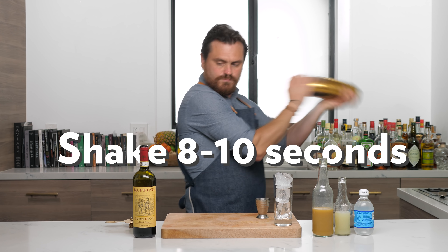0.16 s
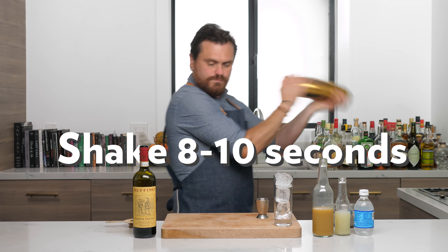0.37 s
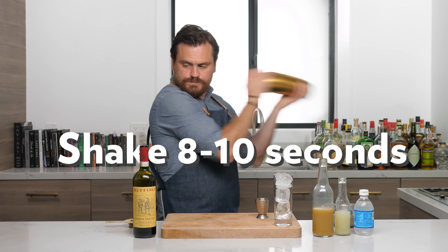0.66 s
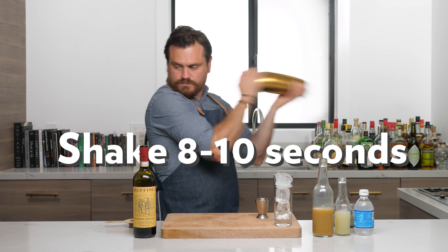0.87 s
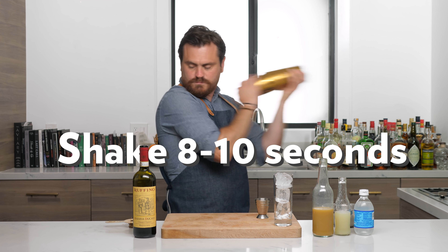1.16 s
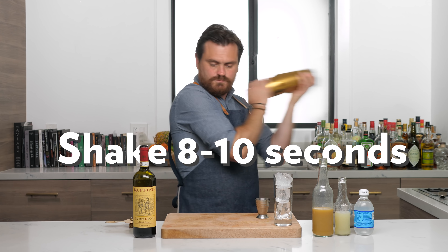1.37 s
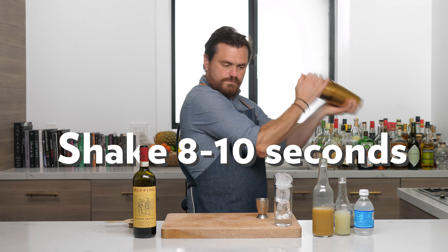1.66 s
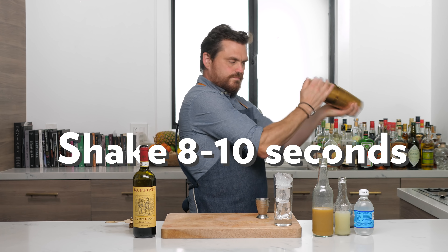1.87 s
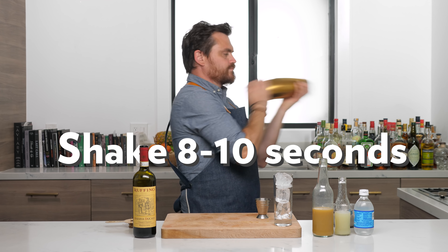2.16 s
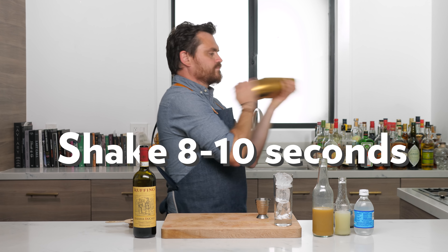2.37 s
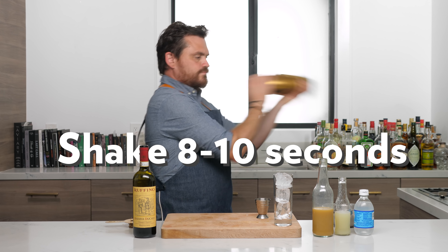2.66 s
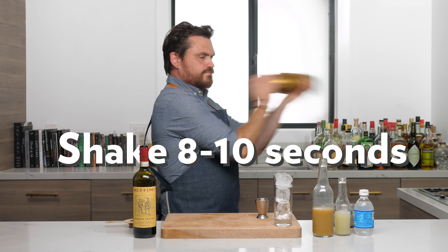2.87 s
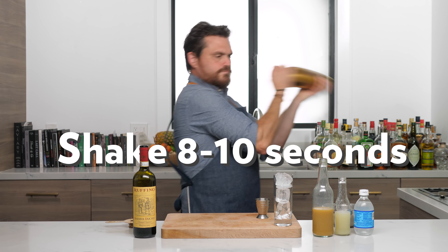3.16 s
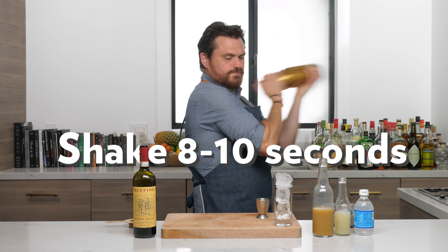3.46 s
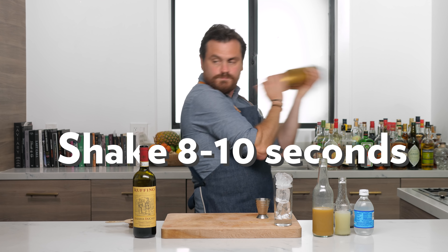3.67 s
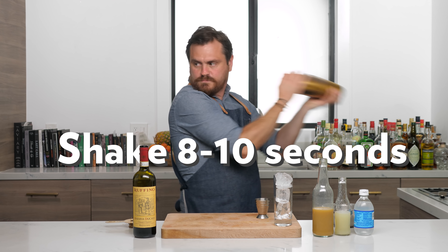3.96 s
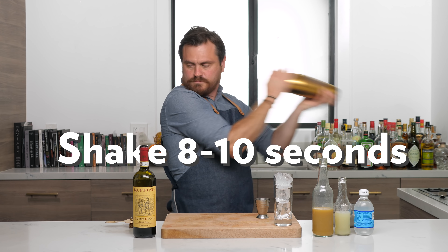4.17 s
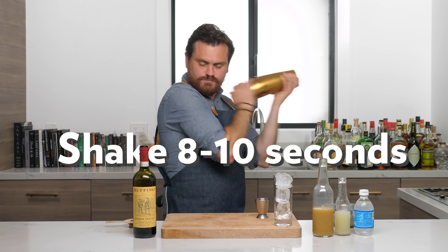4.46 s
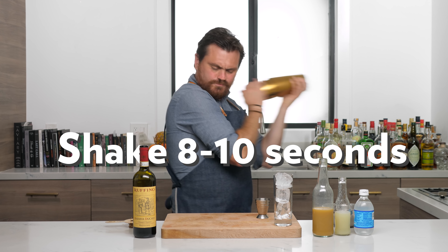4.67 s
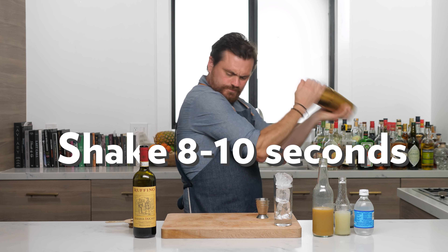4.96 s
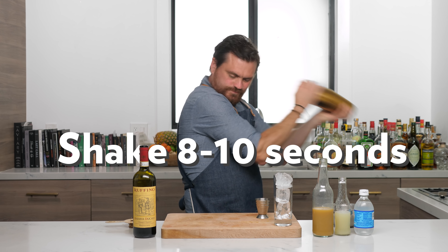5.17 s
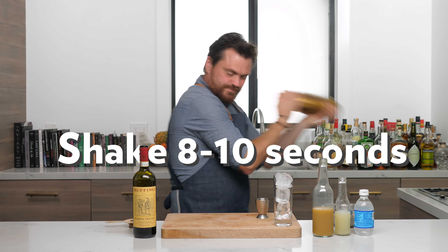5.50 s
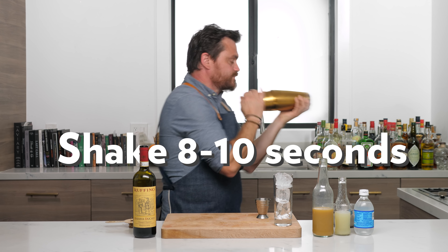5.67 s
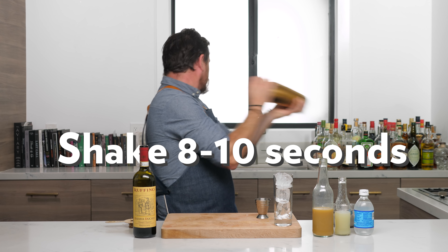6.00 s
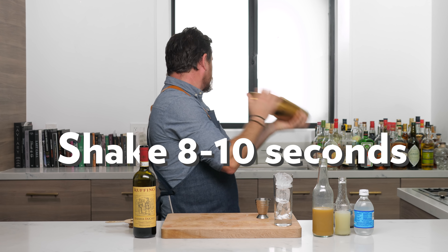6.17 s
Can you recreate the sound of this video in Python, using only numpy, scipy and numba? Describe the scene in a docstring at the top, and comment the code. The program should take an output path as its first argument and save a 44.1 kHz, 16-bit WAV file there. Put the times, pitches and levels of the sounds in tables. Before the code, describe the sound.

Vigorous, steady cocktail shaking: dense crunchy ice clatter, hollow knocks and wet foamy slosh in hand-damped tin, plus low shirt bumps at the microphone.

```python
"""A small kitchen, a clip-on microphone on the shirt: a metal shaker of ice and liquid is shaken hard close by.
It goes back and forth about five times a second. Cubes, chips and spray are bursts of short damped sines and
unpitched cracks, with filtered-noise foam between them, all heard through the resonances of the hand-damped tin.
Pitched knocks and jolts mark the ends of the travel; cloth rumbles, bumps and scratches at the microphone.
The room adds a faint diffuse wash, a fast limiter holds the peaks and the extreme treble is cut."""
import sys
import numpy as np
from scipy import signal
from scipy.fft import rfft, irfft
from scipy.io import wavfile
from scipy.ndimage import uniform_filter1d, minimum_filter1d
from numba import njit

SR = 44100
rng = np.random.default_rng(int(sys.argv[2]) if len(sys.argv) > 2 else 0)


def unload_wav(signal):
    """Save mono or channel-first audio to the path in sys.argv[1] as 16-bit WAV at rate SR, clipped to [-1, 1]."""
    wavfile.write(
        sys.argv[1],
        SR,
        np.round(np.clip(np.atleast_2d(signal).T, -1, 1) * 32767).astype(np.int16),
    )


N = 279505
TIME = np.arange(N) / SR  # seconds

# The load piling into an end of the tin, twice in each back-and-forth; levels before each part's own gain:
# [t/s, tumbling cubes level/dB, chips and spray level/dB]
STROKES = [(0.056, -18, -24.5), (0.164, -19.5, -20.5), (0.261, -20.5, -21), (0.374, -18.5, -18.5),
           (0.468, -19, -20), (0.589, -18, -20), (0.682, -18, -16.5), (0.791, -18.5, -21.5),
           (0.892, -18.5, -20.5), (0.996, -17.5, -19.5), (1.087, -19, -20), (1.207, -18.5, -19.5),
           (1.303, -25.5, -23), (1.442, -19, -17), (1.536, -19.5, -25.5), (1.629, -19, -20),
           (1.734, -21, -19), (1.808, -17.5, -20), (1.918, -19.5, -19), (2.059, -16, -18),
           (2.162, -23.5, -25.5), (2.288, -17.5, -19.5), (2.364, -26, -28), (2.471, -16, -20),
           (2.568, -22, -23.5), (2.674, -21, -22.5), (2.77, -16.5, -18.5), (2.895, -19.5, -21.5),
           (2.981, -20, -21), (3.099, -17.5, -20.5), (3.197, -18, -24), (3.317, -17, -20.5),
           (3.388, -20.5, -19.5), (3.504, -19.5, -20.5), (3.59, -20.5, -23), (3.702, -19, -20),
           (3.797, -23.5, -24.5), (3.924, -21, -22.5), (3.981, -21.5, -20.5), (4.12, -21, -21.5),
           (4.196, -21, -21.5), (4.325, -15, -18), (4.377, -19.5, -18.5), (4.497, -18, -19.5),
           (4.597, -21.5, -21), (4.712, -17.5, -20.5), (4.782, -18.5, -19), (4.918, -18.5, -23),
           (4.988, -21, -21.5), (5.122, -20, -21), (5.187, -17.5, -18.5), (5.295, -17.5, -21.5),
           (5.409, -21, -18.5), (5.506, -19.5, -22), (5.616, -23, -21.5), (5.704, -17, -23.5),
           (5.833, -24, -26), (5.97, -20.5, -18.5), (6.053, -23, -21.5), (6.112, -19, -23),
           (6.188, -23.5, -24), (6.296, -24, -26)]


def load():
    """Close by, in the tin: tumbling cubes, fine chips and spray, foam, and bubbles folded into the drink."""
    _, cubes_db, spray_db = np.transpose(STROKES)

    # one collision gives a ring, a tick and a dull thud
    when, size = contacts(rate=800, spread_db=4.5)
    rings = chatter(when, size, lo_hz=975, hi_hz=4205, t60=0.0081, bounce_s=.004, count=4)
    rings = unit(band(rings, 590, 5800))
    ticks = unit(band(cracks(when, size, t60=.0035), 3400, 15300))
    thuds = chatter(when, size, lo_hz=378, hi_hz=1497, t60=0.0052, bounce_s=0.00096, count=2)
    thuds = unit(band(thuds, 180, 1970))

    when, size = contacts(rate=350, spread_db=5.0)
    spray = chatter(when, size, lo_hz=4180, hi_hz=14800, t60=0.0012, bounce_s=0.0018, count=4)
    spray = unit(band(spray, 2400, 15000))

    when, size = contacts(rate=170, spread_db=5)
    bubbles = unit(chatter(when, size, lo_hz=401, hi_hz=976, t60=0.024, bounce_s=0.00398, count=2))

    # foam rushing along the wall fills the gaps between the contacts
    foam = unit(rng.standard_normal(N))
    low_foam = undb(-6.5) * unit(band(foam, 710, 4730))
    high_foam = undb(-1.5) * unit(band(foam, 3570, 19000))

    bend = np.exp(.021 * walk(rate=10))  # about 2 % wander of the tin's resonances
    cube_surge = surge(cubes_db, lag_s=0, attack_s=0.12, release_s=.03, gain_db=-1.2)
    spray_surge = surge(spray_db, lag_s=-.006, attack_s=.08, release_s=0.0245, gain_db=-0.3)
    slosh_surge = surge(cubes_db, lag_s=-0.25, attack_s=0.073, release_s=0.0424, gain_db=-8.5)

    rattle = share(tin(rings + low_foam, bend)) * cube_surge
    rattle = rattle + share(tin(ticks + spray + high_foam, bend)) * spray_surge
    rattle = rattle + share(tin(thuds + bubbles, bend)) * slosh_surge
    return rattle * free_flight(depth_db=-2, flight_s=.014)


def surge(levels_db, lag_s, attack_s, release_s, gain_db):
    """At each stroke the load slowly gathers speed, piles into the end of the tin and stops short."""
    power = 0
    for s, db in zip(np.transpose(STROKES)[0], levels_db):
        age = TIME - s - lag_s
        fall = np.where(age < 0, (age / attack_s) ** 2, age / release_s)
        power = power + (undb(db + gain_db) * np.exp(-fall)) ** 2
    return np.sqrt(power)


def share(x, window_s=.035):
    """Even out the energy, so a stroke shares it among few big contacts or many small ones."""
    window = int(window_s * SR)
    power = uniform_filter1d(unit(x) ** 2, window)
    return unit(x) / np.sqrt(uniform_filter1d(power, window) + 1e-3)


# Broad colour of the closed tin: [f/Hz, level/dB]
TIN_COLOUR = [(260, -20.5), (380, -7), (520, -5.5), (780, -9.5), (1150, -6), (1700, -0.6), (2100, 0.5),
              (2650, -0.5), (3300, -4), (4200, -7), (4750, -1.5), (5600, -6), (12100, -11), (12700, -25.5)]
# Narrow resonances of its wall and air, centres before bending: [f/Hz, width/Hz, level/dB]
TIN_RINGS = [(510, 29, -13), (1329, 57, -2), (2106, 33, -2), (2532, 57, 1), (2726, 52, 0.5), (3610, 64, -3),
             (9920, 250, -1.5)]


def tin(x, bend):
    """What is inside is heard through the wall; hands keep its rings short, the moving drink bends their pitch."""
    coloured = colour(x, TIN_COLOUR)
    rings = sum(undb(db) * resonate(coloured, hz * bend, float(width)) for hz, width, db in TIN_RINGS)
    return coloured + rings


# Single cubes flying free and striking the wall, all about equally hard: [t/s]
CLACKS = [0.037, 0.164, 0.209, 0.257, 0.618, 0.664, 0.732, 0.819, 1.116, 1.23, 1.308, 1.423, 1.47, 1.553,
          1.586, 1.658, 1.667, 1.73, 1.825, 1.891, 2.042, 2.063, 2.131, 2.274, 2.343, 2.447, 2.515, 2.557,
          2.621, 2.628, 2.684, 2.72, 2.83, 2.959, 3.13, 3.232, 3.377, 3.42, 3.714, 3.752, 3.77, 3.798,
          3.955, 3.985, 4.069, 4.148, 4.225, 4.278, 4.299, 4.354, 4.428, 4.525, 4.627, 4.808, 4.911, 4.935,
          4.999, 5.112, 5.138, 5.173, 5.187, 5.231, 5.315, 5.416, 5.475, 5.499, 5.512, 5.533, 5.567, 5.657,
          5.841, 5.942, 6.039, 6.137, 6.201, 6.263]


def clacks():
    """A hard tick of ice on steel sets off the tin's main ring, at a pitch that depends on where the cube lands."""
    s = np.ravel(CLACKS)
    place, force = rng.random((len(s), 2)).T
    hz = 1900 + 900 * place
    db = 0.6 * (4 * force - 2)  # within 1.2 dB either way
    ring = grains(s, hz, .007, undb(db + 4), .0016)
    clink = grains(s, hz * 1.08, 0.03, undb(db - 15.5), .002)  # the steel rings on faintly
    tick = cracks(s, undb(db - 13.5), t60=.004)
    return band(ring + clink, 1200, 4200) + band(tick, 700, 10000)


# The whole load landing in an end of the tin, before each part's gain and pitch ratio: [t/s, level/dB, f/Hz]
KNOCKS = [(0.046, -10, 425), (0.138, -16, 620), (0.241, -12, 536), (0.345, -14.5, 431), (0.462, -10.5, 440),
          (0.547, -12.5, 544), (0.659, -9.5, 514), (0.689, -15.5, 410), (0.759, -14, 480),
          (0.875, -9.5, 350), (1.087, -13.5, 360), (1.3, -15.5, 412), (1.404, -11.5, 536),
          (1.502, -12, 528), (1.521, -10.5, 522), (1.723, -22, 651), (2.007, -13, 550), (2.237, -7, 562),
          (2.443, -16, 534), (2.554, -16, 544), (2.665, -20, 460), (2.746, -11, 463), (2.973, -14.5, 670),
          (3.053, -6.5, 560), (3.151, -11.5, 520), (3.377, -16, 525), (3.571, -12, 510), (3.795, -20, 358),
          (3.979, -14, 500), (4.175, -13.5, 433), (4.224, -19, 388), (4.303, -14, 522), (4.404, -15, 500),
          (4.497, -12, 500), (4.617, -11.5, 386), (4.699, -17, 640), (5.23, -14, 506), (5.301, -7.5, 546),
          (5.696, -14, 660), (5.83, -13, 334), (6.101, -13.5, 660)]
# What a knock rings with, before a slight random detune: [multiple of its pitch, t60/s, level/dB]
KNOCK_MODES = [(1.001, 0.027, 2.7), (1.4, 0.019, -3), (2.3, 0.017, -4.5)]


def knocks():
    """Ice thumps the end of the tin and the drink slaps in after it; the air trapped there sets the pitch."""
    s, db, hz = np.transpose(KNOCKS)
    slap_s = s + .014 * (.5 + rng.random(len(s)))  # the drink follows by 7 to 21 ms
    slap_t60 = 0.033
    clunk = grains(slap_s, hz * .82, slap_t60, undb(db - 4), slap_t60 / 10)
    for ratio, t60, mode_db in KNOCK_MODES:
        detune = 1 + .02 * rng.standard_normal(len(s))
        clunk = clunk + grains(s, hz * ratio * detune, t60, undb(db + mode_db), .0015)
    # loose cubes land around the knock, the first up to 16 ms ahead of it
    tumble = chatter(s - .016, undb(db - 8.5), lo_hz=380, hi_hz=900, t60=0.02, bounce_s=.05, count=5)
    return band(clunk + tumble, 280, 5000)


def free_flight(depth_db, flight_s):
    """The rattle thins while a cube or the whole load is in the air, just before it lands."""
    landings = np.sort(np.append(CLACKS, np.transpose(KNOCKS)[0]))
    ahead = landings[np.searchsorted(landings, TIME) % len(landings)] - TIME
    return undb(depth_db * np.exp(-(ahead / flight_s) ** 2) * (ahead > 0))


# The tin jolting against the hands, level before the band-pass: [t/s, level/dB]
JOLTS = [(0.045, -11.5), (0.24, -15.5), (0.875, -14.5), (1.087, -12), (1.502, -17), (1.521, -13),
         (1.723, -16), (2.554, -12), (3.151, -14), (4.175, -14.5), (4.224, -13), (4.404, -15), (5.83, -20)]


def jolts():
    """The tin is stopped short by the hands with a dull thump, a quick damped sine around 225 Hz."""
    s, db = np.transpose(JOLTS)
    hz = 225 * np.exp(.12 * rng.standard_normal(len(s)))
    return band(grains(s + .001, hz, 0.021, undb(db), .0008), 120, 5000)


# The shirt bumping the microphone, before each part's gain and pitch ratio: [t/s, level/dB, f/Hz]
BUMPS = [(0.298, -18.5, 43.1), (0.579, -20.5, 156), (0.625, -15, 70.0), (0.719, -24, 80),
         (1.414, -24, 70.0), (1.566, -20, 136), (1.764, -15.5, 40.4), (1.877, -15.5, 79), (1.99, -15, 97.5),
         (2.101, -10.5, 66), (2.502, -11.5, 59.2), (2.529, -10.5, 37.7), (3.339, -8, 103), (3.631, -18, 54),
         (4.271, -23, 70), (4.367, -10.5, 48.4), (4.568, -9, 53.8), (4.765, -20.5, 80), (4.956, -15, 82),
         (4.98, -9, 67), (5.446, -24, 49.3), (5.655, -17, 58)]
# Colour of cloth rumble at the microphone: [f/Hz, level/dB]
CLOTH = [(15, -15), (30, 4), (80, -0.5), (130, -7.5), (220, -14.5), (500, -37), (2000, -77)]
# How hard the shirt drags over the microphone, before a random wander: [t/s, level/dB]
SHIRT_DRAG = [(0, 1), (1.2, -6), (2, -2), (3, -5), (4.1, -10), (4.4, 2), (5.2, -6), (5.7, -9), (6.3, -13)]


def shirt():
    """Right at the microphone, cloth drags in uneven rumbles and bumps it with low damped sines."""
    s, db, hz = np.transpose(BUMPS)
    bumps = band(grains(s + 0.0026, hz, 0.065, undb(db + 6.5), 0.0056), 20, 270)
    fold_hz = hz * (1.6 + 1.53 * rng.random(len(s)))
    folds = band(grains(s + 0.00834, fold_hz, 0.051, undb(db - 4.5), 0.0033), 97, 560)

    when, size = contacts(rate=37, spread_db=7.5)
    drag = chatter(when, size, lo_hz=25.0, hi_hz=127, t60=0.078, bounce_s=0.019)
    drag = unit(colour(drag, CLOTH))
    rumble = unit(colour(rng.standard_normal(N), CLOTH))
    vigour_db = np.interp(TIME, *np.transpose(SHIRT_DRAG)) + 2.9 * walk(rate=13) - .7
    rubbing = undb(vigour_db) * (undb(-31.5) * drag + undb(-34.5) * rumble)
    return bumps + folds + band(rubbing, 15, 2000)


# The sleeve brushing the microphone on forward pushes, before a common gain: [t/s, level/dB]
SWISHES = [(.04, -30.5), (.245, -28), (.44, -27), (.65, -33), (.87, -36), (1.27, -27.5), (1.48, -28.5),
           (1.91, -26.5), (2.75, -36), (3.17, -31), (3.37, -33), (3.58, -29.5), (3.715, -30), (3.98, -28),
           (4.38, -32), (4.58, -32), (4.79, -35), (5.18, -28)]


def swishes():
    """At the microphone, fibres catch and slip in a short, very bright scratch."""
    when, size = contacts(rate=280, spread_db=3)
    fibres = cracks(when, size, t60=0.0037)
    half_length_s, gain_db = 0.028, 3.5
    push = sum(undb(db + gain_db) * np.exp(-((TIME - s) / half_length_s) ** 2) for s, db in SWISHES)
    return share(band(fibres, 7200, 14000)) * push


def kitchen(x, t60, wet_db):
    """The moving shaker is answered by the room with a diffuse noise wash that follows each band's energy."""
    keep = np.exp(-np.log(1e6) / (t60 * SR))  # energy falls 60 dB in t60 seconds
    wash = 0
    for lo_hz in 375 * 2 ** np.arange(0, 5, .5):  # half-octave bands
        hi_hz = lo_hz * np.sqrt(2)
        energy = signal.lfilter([1 - keep], [1, -keep], band(x, lo_hz, hi_hz) ** 2)
        wash = wash + np.sqrt(energy) * unit(band(rng.standard_normal(N), lo_hz, hi_hz))
    return x + undb(wet_db) * wash


def contacts(rate, spread_db):
    """Times and sizes of random collisions, rate per second: many small, few large."""
    moment, luck = rng.random((int(rate * TIME[-1]), 2)).T
    return moment * TIME[-1], undb(-spread_db * np.log(1 - .98 * luck))


def chatter(when, size, lo_hz, hi_hz, t60, bounce_s, count=3):
    """Each piece has its own pitch and touches several times in quick succession, never quite the same way."""
    pitch = np.repeat(lo_hz + (hi_hz - lo_hz) * rng.random(len(when)), count)
    pitch = pitch * np.exp(0.185 * rng.standard_normal(len(pitch)))
    lag = bounce_s * rng.random((len(pitch), 2)).mean(axis=1)
    touches = np.repeat(when, count) + lag
    return grains(touches, np.minimum(pitch, SR / 2), t60, np.repeat(size, count), t60 / 4)


@njit
def grains(times, hz, t60, size, rise_s):
    """One damped sine for each contact or bubble; it builds up while the contact lasts."""
    out = np.zeros(N)
    for k in range(len(times)):
        start = max(int(times[k] * SR), 0)
        z = size[k] + 0j
        pole = np.exp((2j * np.pi * hz[k] - np.log(1000) / t60) / SR)
        for i in range(start, min(N, start + int(t60 * SR))):
            out[i] += z.imag * min((i - start + 1) / (rise_s * SR), 1)
            z *= pole
    return out


def cracks(when, size, t60):
    """A hard or catching contact with no pitch: a brief noise burst whose energy swells and dies away."""
    keep = np.exp(-np.log(1e6) / (t60 * SR))
    energy = np.bincount((when * SR).astype(int), size ** 2, N)[:N] + 1e-18
    energy = signal.lfilter([np.e * (1 - keep)], np.poly([keep, keep]), energy)
    return np.sqrt(np.abs(energy)) * rng.standard_normal(N)


@njit
def resonate(x, hz, width):
    """A resonance as a two-state band-pass whose centre moves every sample."""
    out, band_state, low_state = np.empty(len(x)), 0., 0.
    for i in range(len(x)):
        g = np.tan(np.pi * hz[i] / SR)
        damping = width / hz[i]
        v = (band_state + g * (x[i] - low_state)) / (1 + g * (g + damping))
        band_state = 2 * v - band_state
        low_state = low_state + 2 * g * v
        out[i] = damping * v
    return out


def colour(x, points, size=4096):
    """Causal (minimum-phase) filter through (Hz, dB) points, by folding the cepstrum."""
    hz, db = np.transpose(points)
    bins_hz = np.arange(size // 2 + 1) * SR / size
    log_gain = np.log(undb(np.interp(np.log(bins_hz + 1), np.log(hz), db)))
    cepstrum = irfft(log_gain)
    cepstrum[1:size // 2] *= 2
    cepstrum[size // 2 + 1:] = 0
    impulse = irfft(np.exp(rfft(cepstrum, size)))
    return signal.fftconvolve(x, impulse)[:len(x)]


def band(x, lo_hz, hi_hz, order=2):
    """Causal band-pass."""
    sos = signal.butter(order, [lo_hz, min(hi_hz, .49 * SR)], "band", fs=SR, output="sos")
    return signal.sosfilt(sos, x + 1e-18)


def walk(rate):
    """Smooth random wander of rms 1, with rate knots per second."""
    knots = np.arange(0, TIME[-1] + 1, 1 / rate)
    return unit(np.interp(TIME, knots, rng.standard_normal(len(knots))))


def undb(db):
    """Decibels to gain."""
    return 10 ** (np.asarray(db) / 20)


def unit(x):
    """Scale to rms 1."""
    return x / np.sqrt(np.mean(x ** 2))


def scene():
    """The shaker close by in its room, and the shirt right at the microphone."""
    shaker = load() + clacks() + knocks() + jolts()
    in_room = kitchen(shaker, t60=.2, wet_db=-17)
    return (in_room + shirt() + swishes())[None]


def record(dry, ceiling_db=-3, hold_s=0.0017):
    """At the microphone's output a fast limiter holds the peaks, and the top is cut above 15850 Hz."""
    hold = int(hold_s * SR)
    gain = 1 / np.maximum(np.abs(dry) / undb(ceiling_db), 1)
    gain = uniform_filter1d(minimum_filter1d(gain, hold), hold)
    top_cut = signal.ellip(10, .2, 80, 15850, fs=SR, output="sos")
    return signal.sosfilt(top_cut, dry * gain)


dry = scene()
out = record(dry)
unload_wav(out)
```